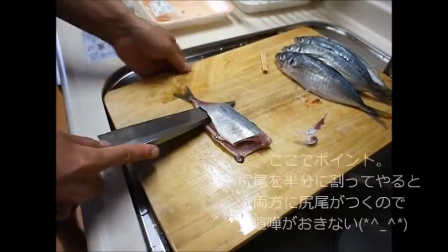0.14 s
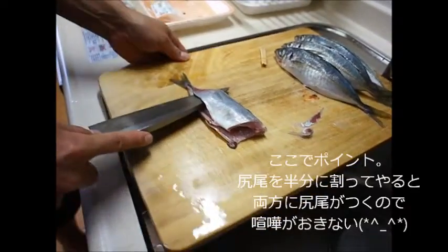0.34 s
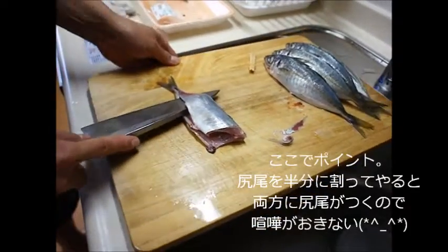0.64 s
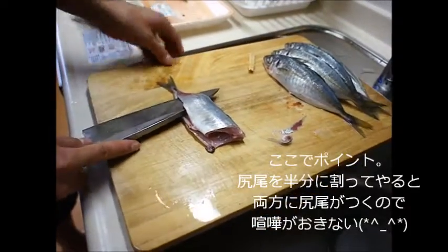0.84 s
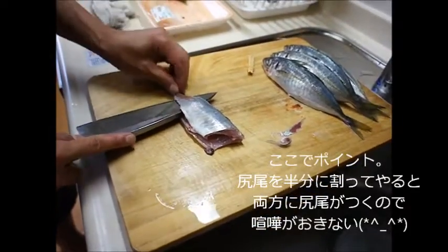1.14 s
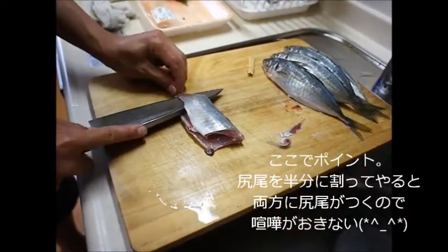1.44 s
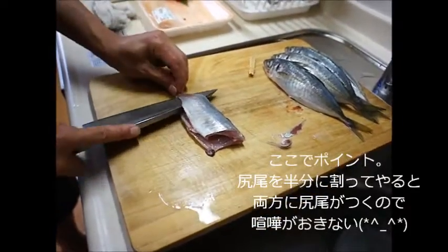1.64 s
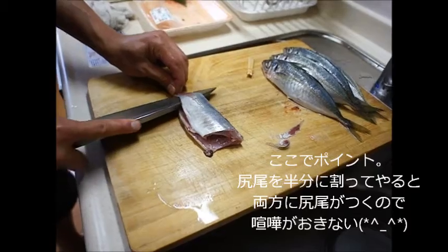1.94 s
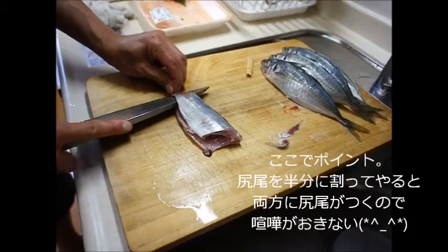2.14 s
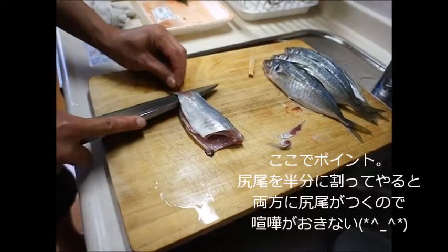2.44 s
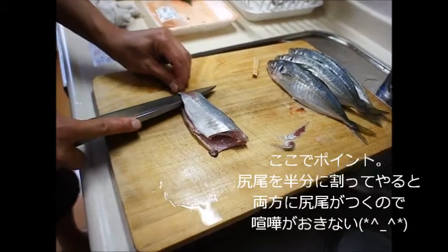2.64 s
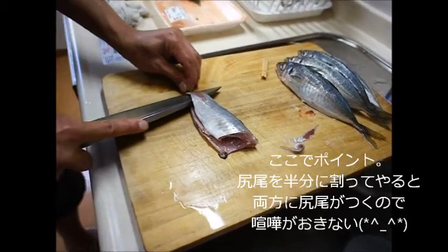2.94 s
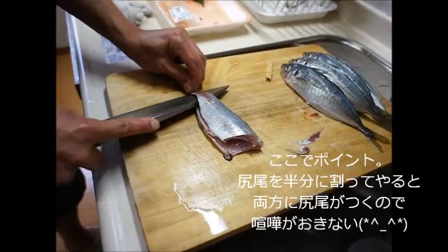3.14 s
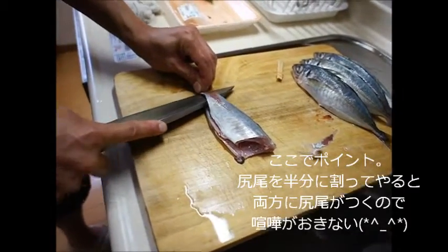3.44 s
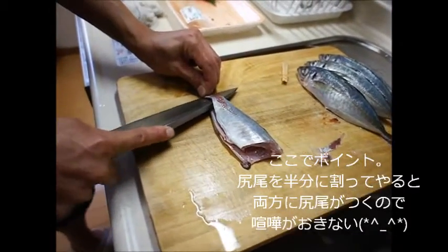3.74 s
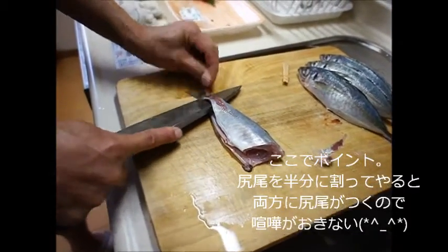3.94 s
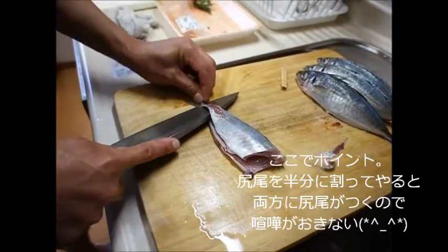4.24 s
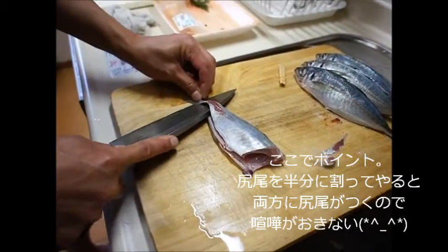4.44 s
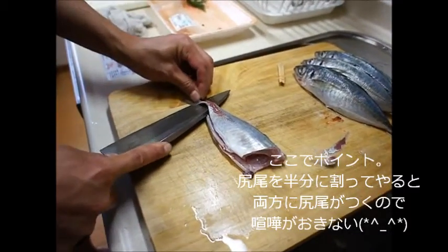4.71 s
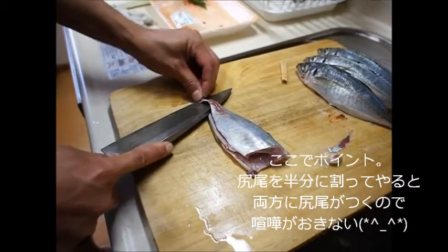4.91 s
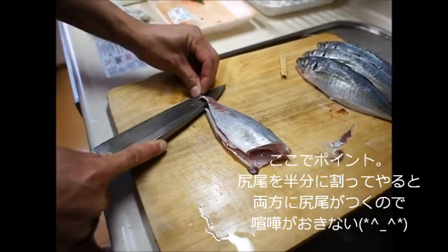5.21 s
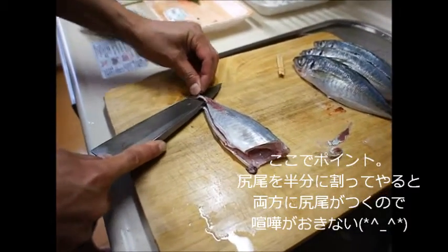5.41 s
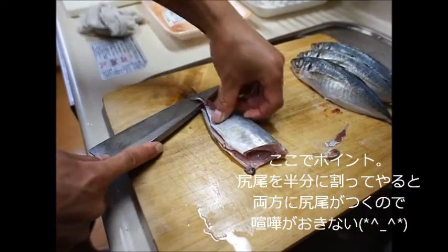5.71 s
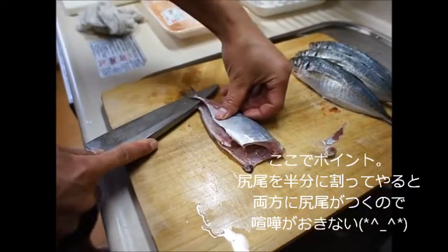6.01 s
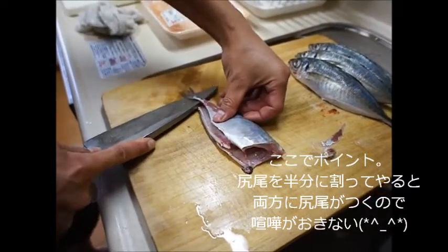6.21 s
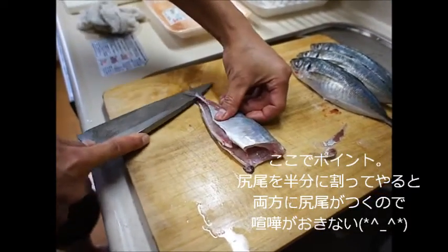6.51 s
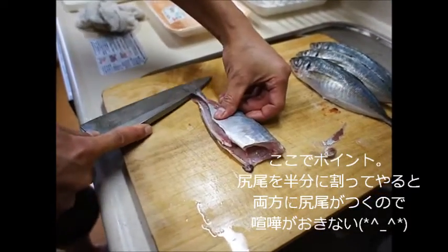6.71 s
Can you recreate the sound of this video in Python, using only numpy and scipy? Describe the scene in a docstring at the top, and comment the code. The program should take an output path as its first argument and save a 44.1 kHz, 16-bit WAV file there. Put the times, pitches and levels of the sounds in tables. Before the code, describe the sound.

Gritty sawing strokes and knocks of a blade on a cutting board, with creaky handling bumps, a ticking lens motor and soft room hum.

```python
"""A kitchen counter, close up: a knife strokes and taps a board to the right of a small hand-held camera.
After the first short strokes the board lands on the counter and rattles; the sawing then thickens.
Strokes are gritty stick-slip force and taps short blows, both driving the board's resonances into a diffuse room.
In the camera the grip creaks in low thumps and the lens motor ticks in every frame; skin ticks, the room hums.
The two ports hear the board with unlike phase; grip and lens come inverted on the right, and weaker."""
import sys
import numpy as np
from scipy import signal
from scipy.fft import rfft, irfft
from scipy.io import wavfile
from scipy.ndimage import uniform_filter1d, map_coordinates

SR = 44100
rng = np.random.default_rng(int(sys.argv[2]) if len(sys.argv) > 2 else 0)


def to_wav(s):
    """Save 16-bit WAV."""
    ch = np.atleast_2d(s).T  # columns
    pcm = np.round(np.clip(ch, -1, 1) * 32767)  # PCM
    wavfile.write(sys.argv[1], SR, pcm.astype(np.int16))


N = 302526
T = np.arange(N) / SR
HZ = np.fft.rfftfreq(N, 1 / SR)

# knife strokes: start t/s, length/s, level/dB, swell over the stroke/dB, then ring, knock, bite re level/dB
STROKES = [(0.027, 0.039, -36, -17.5, 1, -6, -14.5), (.116, 0.035, -35.5, 2, -14, -13, -33),
           (0.178, 0.0083, -16, 10, -13, -37, -49), (1.186, 0.029, -41, -11, -23, -22, -39),
           (1.436, 0.018, -29, 20, -13, -8.5, -13), (1.507, 0.08, -26.5, -4, -10.5, -9.5, -17),
           (1.642, 0.094, -22.5, 1.5, -8, -13, -16), (1.8, 0.12, -31.5, -21, -9, -14, -16.5),
           (1.902, 0.1, -26.5, 6.5, -3.5, -10.5, -11.5), (2.037, 0.085, -26.5, 12.5, -5.5, -14.5, -16),
           (2.168, 0.094, -18, -7, -8, -12, -19.5), (2.552, .14, -25.5, 12, -7.5, -12.5, -20.5),
           (2.744, 0.079, -21, 14.5, -3.5, -10.5, -16), (2.878, 0.097, -31, 5.5, -6, -6.5, -12.5),
           (3.013, 0.088, -22, 0, -6.5, -5.5, -13.5), (3.152, 0.078, -24.5, 6, -5, -9, -17),
           (3.288, 0.059, -16.5, 1.5, -8.5, -10, -17.5), (3.36, 0.014, -21, -9, -15, -12, -30),
           (3.415, 0.062, -18.5, 1.5, -8, -8, -18), (3.515, 0.086, -17.5, 3.5, -3, 1.5, -11),
           (3.65, 0.077, -24, 4, 3, 4, -12.5), (3.757, 0.067, -18, 2.5, 0.5, -0.5, -9),
           (3.826, 0.026, -24, 1, 2, 13.5, -6.5), (4.947, 0.07, -29, 2, -7, 2.5, -12),
           (5.083, 0.066, -27.5, -3, -14, 2, -14.5), (5.209, 0.068, -24, -7, -1, 5.5, -15),
           (5.31, 0.037, -26.5, -7, -5, -6, -26), (6.225, 0.069, -21, -5, -0.5, -14, -19),
           (6.305, 0.04, -27.5, 3, -1, -4, -16.5), (6.345, 0.04, -40.5, -3, -11, 3, -1.5)]
# blade taps on the board: t/s, crack level/dB, blow level/dB
TAPS = [(0.1751, -73, -18), (0.416, -72, -26), (1.345, -39, -64), (1.458, -40, -33), (1.7974, -38, -27.5),
        (1.9245, -58, -19), (1.954, -52, -21.5), (2.187, -46, -29), (2.0598, -33.5, -41),
        (2.234, -30.5, -47), (2.7872, -26.5, -27), (2.809, -23.5, -35), (3.039, -32, -36),
        (3.287, -21, -28), (3.42, -69, -43), (3.5368, -36, -21.5), (3.571, -21.5, -21.5), (3.603, -40, -25),
        (3.656, -38, -33), (3.69, -41, -32), (3.762, -44, -24), (3.7758, -23.5, -15), (3.7916, -14, -27),
        (3.814, -22, -30), (3.838, -37, -30), (4.9492, -48.5, -19.5), (5.0874, -46.5, -22.5),
        (5.2229, -39.5, -22), (6.2124, -38, -9)]
# the board lands on the counter, hard against hard: t/s, crack level/dB, blow level/dB
LANDINGS = [(.478, -20.5, -15.5), (.526, -45, -24.5), (0.5477, -18, -23.5), (0.572, -36, -27),
            (0.594, -47, -42)]


def undb(db):
    """Amplitude ratio of a level in dB."""
    return 10 ** (np.asarray(db) / 20)


def over_hz(table, hz=HZ):
    """A (f/Hz, value) table read on a log-frequency axis."""
    f, v = np.transpose(table)
    return np.interp(np.log(hz + 20), np.log(f + 20), v)


def unit(x):
    """The signal scaled to an rms of 1."""
    return x / np.sqrt(np.mean(x ** 2))


def add(track, s, sound):
    """Lay a sound into the track at s seconds."""
    i = int(s * SR)
    track[i:i + len(sound)] += sound[:max(N - i, 0)]


def peak(x, hz, width, order):
    """A resonance: one pass answers a blow at once, two passes have steep flanks."""
    b, a = signal.iirpeak(hz, hz / width, SR)
    for _ in range(order):
        x = signal.lfilter(b, a, x)
    return x


def ring(x, modes, wander_db=0., order=2):
    """Sum of resonances, rms near 1 for white noise; each one's share wanders as the contact point moves."""
    hz, width, db = np.transpose(modes)
    width = np.maximum(width, hz / 30)  # no mode is sharper than this
    knots = np.arange(0, T[-1] + .1, .06)
    out = 0
    for f, w, d in zip(hz, width, db):
        share = undb(d)
        if wander_db:
            share = undb(np.interp(T, knots, d + wander_db * rng.standard_normal(len(knots))))
        out = out + peak(share * x, f, w, order)
    return out / np.sqrt(np.sum(undb(2 * db) * np.pi * width / (2 * SR)))


def burst(t60, rise_s=0.00025):
    """Noise that rises fast and dies away by 60 dB in t60 seconds."""
    t = T[:4000]
    fade = undb(-60 * np.maximum(t - rise_s, 0) / t60)
    return rng.standard_normal(len(t)) * np.clip(t / rise_s, 0, 1) * fade


def grit(scatter_db, grain_s):
    """Stick-slip force: noise in grains of uneven size."""
    k = max(int(grain_s * SR), 1)
    size = undb(scatter_db * np.minimum(rng.exponential(size=N // k + 1), 3))
    return unit(rng.standard_normal(N) * uniform_filter1d(np.repeat(size, k)[:N], k))


def hum():
    """Steady room and preamplifier noise, partly inverted between the sides."""
    # noise colour of room and preamplifier: f/Hz, level/dB per Hz
    room_colour = [(40, -9), (113, -2.5), (250, -1.5), (440, -6), (700, -8), (1100, -12.5), (2100, -17.5),
                   (3900, -20.5), (5700, -24), (11000, -27.5), (13000, -34.5)]
    # left side re right: f/Hz, level/dB
    left_db = [(60, 11.5), (400, -1), (2400, -3), (8000, -2), (14000, -6)]
    # likeness of the two sides: f/Hz, left-right correlation (negative is inverted)
    likeness = [(60, -0.34), (600, -0.56), (3000, -0.2), (7000, 0.13)]
    a, b = rfft(rng.standard_normal((2, N)))
    c = over_hz(likeness)
    tilt_db = over_hz(left_db) / 2
    pair = np.array([a * undb(tilt_db), (c * a + np.sqrt(1 - c ** 2) * b) * undb(-tilt_db)])
    return undb(-47) * unit(irfft(pair * undb(over_hz(room_colour)), N))


def lens():
    """The motor steps at the same places in every frame: a tick, then a whirr in the case's high modes."""
    # modes of the camera's case: f/Hz, width/Hz, level/dB
    case_modes = [(876, 275, 28), (3100, 2500, 7.5), (3860, 560, 12.5), (4210, 610, 9), (5440, 100, -13)]
    # effort of the motor: t/s, level/dB
    effort = [(0, 5), (.98, 7), (1.06, -16), (2.55, -20), (3.1, 0.5), (4.2, 6.5), (5.5, 2.5), (6.86, 5)]
    # steps within each frame: start t/s, length/s, tick level/dB, whirr level/dB
    steps = [(.0045, 0.015, -40.5, -55.5), (0.0188, 0.0018, -51, -59), (0.0236, 0.0075, -43, -61),
             (0.034, 0.0041, -46.5, -55.5)]
    # short whines: t/s, level/dB
    whines = [(0.9844, -35), (3.135, -34.5), (3.203, -34.5)]
    frame_s, whine_hz, whine_s = 1001 / 30000, 3790, 0.021
    whirr_share = 0.3  # the whirr follows the effort less than the ticks

    tick_push, whirr, place = np.zeros(N), np.zeros(N), T % frame_s
    starts = np.arange(0, T[-1] - frame_s, frame_s)
    for s, length, tick_db, whirr_db in steps:
        tick_push[((starts + s) * SR).astype(int)] += undb(tick_db + 2.2 * rng.standard_normal(len(starts)))
        whirr += undb(whirr_db) * ((place - s) % frame_s < length)
    whirr = uniform_filter1d(whirr, size=60) * rng.standard_normal(N)
    # each step is a short push
    tick_push = signal.lfilter(signal.windows.hann(int(0.00037 * SR)) / 4, 1, tick_push)
    thud = signal.lfilter(*signal.iirpeak(330, 1.2, SR), tick_push)
    effort_db = np.interp(T, *np.transpose(effort))
    out = undb(effort_db) * (2.36 * ring(tick_push, case_modes) + 32.2 * thud)
    out += undb(whirr_share * effort_db + 3) * ring(whirr, case_modes[1:])

    t = T[:int(whine_s * SR)]
    edges = np.clip(np.minimum(t, t[-1] - t) / 0.002, 0, 1)
    for s, db in whines:  # a run of fast steps, hardest as it sets off
        shape = (0.5 + 0.75 * np.exp(-(t / 0.0064) ** 2)) * edges
        add(out, s, undb(db) * shape * np.sin(2 * np.pi * whine_hz * t))
    return out


def slips():
    """Grip slips at set times plus random ones that fill gaps in the creak: crest t/s, level/dB, f/Hz, trough/dB."""
    # slips felt through the case: crest t/s, crest level/dB, pitch at the crest f/Hz
    timed = [(0.137, -20.5, 170), (.185, -18.5, 183), (0.2047, -14, 400), (0.7372, -1, 445),
             (0.8844, -17, 258), (2.144, -19.5, 225), (3.115, -19, 175), (3.141, -16.5, 240),
             (3.175, -7.5, 280), (3.219, -8.5, 270), (3.255, -8, 245), (3.278, -9, 242), (3.2949, -3, 240),
             (3.3204, -9, 220), (3.352, -10, 220), (3.3791, -5.5, 188), (3.4, -11, 230), (3.422, -6, 210),
             (3.442, -10, 240), (3.463, -10, 210), (3.49, -8, 230), (3.507, -8, 200), (3.5282, -3, 200),
             (3.547, -7, 231), (3.566, -7, 277), (3.617, -8, 153), (3.636, -10, 230), (3.655, -7.5, 210),
             (3.68, -10, 260), (3.7112, -12.5, 320), (3.7556, -11, 315.6), (3.8451, -10, 177),
             (3.8763, -8, 261), (3.905, -10.5, 231.3), (3.9331, -10, 168.4), (3.957, -6.5, 204),
             (3.9741, -7.5, 235), (3.989, -7, 210), (4.009, -12, 230), (4.0173, -13, 150),
             (4.0282, -7, 141), (4.0578, -11, 230), (4.073, -7.5, 248), (4.09, -9.5, 248), (4.108, -4, 151),
             (4.114, -5.5, 280), (4.128, -11, 200), (4.135, -8, 419), (4.159, -11, 383), (4.177, -8, 282),
             (4.2172, -7.5, 235), (4.32, -12, 265), (4.4325, -11.5, 296.6), (4.475, -25.5, 366),
             (4.514, -3.5, 320), (4.5554, -14, 427), (4.5679, -8.5, 240), (4.5969, -11.5, 250),
             (4.612, -22, 385), (4.7929, -12, 387), (4.826, -21.5, 133), (4.863, -19, 236),
             (4.9208, -24, 159), (5.578, -27, 307), (5.6243, -31, 260.9), (6.601, -20.5, 128.9)]
    creak_start_s, creak_end_s, period_s, jitter_s = 3.25, 4.22, 0.021, 0.00205
    creak_db, scatter_db, creak_hz = -11.5, 2, 254
    # trough before the crest, re crest; a quicker slip in the creak digs a deeper one
    creak_trough_db, lone_trough_db, trough_db_per_octave = -10, -1.4, 16

    def creaking(s):
        return creak_start_s < s < creak_end_s

    rows = []
    for s, db, hz in timed:
        trough_db = lone_trough_db
        if creaking(s):
            trough_db = min(creak_trough_db + trough_db_per_octave * np.log2(hz / creak_hz), 0)
        rows.append((s, db, hz, trough_db))
    for (a, *_), (b, *_) in zip(timed, timed[1:]):
        if creaking(a) and creaking(b):
            gaps = max(round((b - a) / period_s), 1)
            for s in np.linspace(a, b, gaps + 1)[1:-1]:
                late, size, pitch = rng.standard_normal(3)
                rows.append((s + jitter_s * late, creak_db + scatter_db * size,
                             creak_hz * np.exp(.15 * pitch), creak_trough_db))
    return rows


def grip():
    """Each slip bends the case: the quick waves come first, the pitch sinks to the case's slow wobble."""
    # the hand rubs and sways the camera: t/s, relative level/dB
    hand_sway = [(0.0, -59), (0.88, -58), (0.97, -68), (2.79, -56.5), (3.4, -36.5), (3.7, -41.5),
                 (4.18, -32.5), (4.3, -41.5), (6.46, -66), (6.61, -52), (6.69, -69), (6.86, -70)]
    wobble_hz = 105
    out, t = np.zeros(N), T[:2600] - 600 / SR  # the crest is at t = 0
    for s, db, hz, trough_db in slips():
        pitch_hz = wobble_hz + (hz - wobble_hz) * np.exp(-np.clip(t / 0.0012, -.35, 20))
        phase = 2 * np.pi * np.cumsum(pitch_hz) / SR
        phase -= np.interp(0, t, phase)
        trough = undb(trough_db * np.clip(-phase / np.pi, 0, 1))
        before = trough * np.clip(2.4 + phase / (1.2 * np.pi), 0, 1) ** 2
        after = 0.5 * np.exp(-t / 0.00081) + 0.46 * np.exp(-t / 0.0087)
        add(out, s + t[0], undb(db) * np.where(t < 0, before, after) * np.cos(phase))
    # soft skin rounds every slip
    out = signal.sosfiltfilt(signal.butter(2, 1700, fs=SR, output="sos"), out)
    rub = undb(np.interp(T, *np.transpose(hand_sway)) + 9) * grit(4.0, 0.011)
    # low modes of the case: f/Hz, width/Hz, level/dB
    return out + ring(rub, [(65.5, 45, 0.5), (127.5, 45, -5.0), (419, 264, -11.5)])


def pressure(s, length, swell_db):
    """Force of one stroke: rise, swell (one row per mode group), release."""
    release_s = 0.059
    struck = np.min(np.abs(np.array(TAPS + LANDINGS)[:, 0] - s)) < .012
    rise_s = 0.0047 if struck else 0.28 * length  # a stroke that begins with a blow starts at once
    span = slice(int(s * SR), int((s + length + release_s) * SR))
    t = T[span] - s
    edges = np.clip(t / rise_s, 0, 1) * np.clip((length - t) / release_s + .5, 0, 1)
    return span, np.sin(np.pi / 2 * edges) ** 2 * undb(swell_db * (np.clip(t / length, 0, 1) - .5))


def catches():
    """The edge catches on grain and bone: brief jolts of force at random moments."""
    rate_per_s, jolt_db, fade_s = 70, 3, 0.0017  # jolt re the steady rub
    jolt = (rng.random(N) < rate_per_s / SR) * rng.exponential(size=N)
    return unit(1 + undb(jolt_db) * signal.lfilter([1], [1, -np.exp(-1 / (fade_s * SR))], jolt))


def blows(rows):
    """Force of short blows on four mode groups; the last two rows are the crack toward each port."""
    knock_share = 0.47  # a blow takes this share of the nearest stroke's knock dB
    hit = np.zeros((6, N))
    for s, crack_db, blow_db in rows:
        contact_s = 0.00069 * np.exp(-0.03 * (crack_db + 25))  # a sharper crack is a shorter contact
        width = max(int(contact_s * SR), 6)
        # a shorter contact reaches higher modes
        blow = undb(blow_db) * signal.windows.hann(width) / (width / SR)
        knock_db = min(STROKES, key=lambda row: abs(row[0] - s))[5]
        add(hit[0], s, 0.0013 * blow)
        add(hit[1], s, 0.00076 * blow)
        add(hit[2], s, 0.0016 * undb(knock_share * knock_db) * blow)
        add(hit[3], s, 0.0012 * blow)
        add(hit[3], s, undb(crack_db + 1.0) * burst(0.0095))
        for side in hit[4:]:
            add(side, s, undb(crack_db - 2.5) * burst(0.022))
    return hit


def bend(x):
    """The hand's weight shifts the board's modes: pitch sways as the sound is read through a moving delay."""
    shift = 0.0122  # typical share of the pitch
    knots = np.arange(0, T[-1] + .2, .09)
    sway = shift * rng.standard_normal(len(knots) + 1)
    offset_samples = np.cumsum(np.interp(T, knots, np.diff(sway) / np.sqrt(2)))
    return map_coordinates(x, [np.arange(N) + offset_samples], order=1, mode="nearest")


def knife():
    """Strokes, taps and landings drive the board; returns the dry sound toward the left and the right port."""
    # fingers slide over fish and board as the hand takes a new hold: start t/s, length/s, level/dB,
    # swell over the slide/dB, then ring, knock, bite re level/dB
    fingers = [(1.317, 0.12, -35, 19, -15, -8.5, -17.5), (4.086, 0.12, -44, 9, 2, -7, -4.5),
               (4.23, 0.098, -31.5, 0, -12, -6.5, -14.5), (4.392, 0.059, -36.5, -4, -9, -4.5, -12.5),
               (4.513, 0.065, -35, -1.5, 2, 5, -8), (4.651, 0.034, -37.5, -4, -16, -12, -17)]
    # board modes, low ones that answer any push: f/Hz, width/Hz, level/dB
    body_modes = [(149.6, 31, -13), (192.2, 42, -5.5), (221.5, 45, -5), (266.8, 41, 2), (292.2, 27.6, -3),
                  (371, 69, -23.5)]
    # those that ring clearest: f/Hz, width/Hz, level/dB
    ring_modes = [(507.5, 11, -11), (557.4, 43, 2), (591.8, 31.5, -3.5), (668, 26, -10.5)]
    # middle ones: f/Hz, width/Hz, level/dB
    knock_modes = [(738, 102, 1), (801, 74, 1.5), (877.5, 75, 2.5), (968.5, 74, 5.5), (1011, 45, 1.5),
                   (1049, 60, 0.5), (1137, 126, -3.5), (1302, 69, -9.5)]
    # high ones that answer the bite of the edge: f/Hz, width/Hz, level/dB
    bite_modes = [(1446, 126, 4.5), (1574, 86, 5), (1700, 110, 9.5), (1799, 106, 5.5), (1990, 74, 3.5),
                  (2230, 116, 0.5), (2413, 180, 2), (2620, 120, 2), (2763, 100, 1.5), (2970, 320, -1.5)]
    # broad hiss of the edge: f/Hz, width/Hz, level/dB
    hiss_modes = [(3420, 620, 16), (4410, 2830, 20.3), (6600, 6000, 11), (9370, 6500, 3.6)]
    stroke_hiss_db, finger_hiss_db = -8.5, 1  # re bite
    tap_db = 1  # a blade tap in the board modes, re a landing
    alike = 0.4  # share of the hiss that both sides hear alike

    push = np.zeros((5, N))
    # the treble follows the pressure more steeply
    steepness = np.array([[1.0], [1.0], [1.05], [1.15], [1.25]])
    rows = [(*row, stroke_hiss_db) for row in STROKES] + [(*row, finger_hiss_db) for row in fingers]
    for s, length, db, swell_db, ring_db, knock_db, bite_db, hiss_db in rows:
        span, force = pressure(s, length, swell_db * steepness)
        group_db = np.array([0, ring_db, knock_db, bite_db, bite_db + hiss_db])
        push[:, span] += force * undb(db + group_db[:, None])
    push[:4] *= catches()
    rub = push * np.array([grit(1.25, 0.013), grit(1.17, 0.0057), grit(4.0, 0.0047),
                           grit(0.49, 0.0019), grit(0.32, 0.0022)])

    taps, lands = blows(TAPS), blows(LANDINGS)
    board = rattle()
    thin = signal.butter(3, 115, "high", fs=SR, output="sos")  # a small board radiates no deep bass
    groups = (body_modes, ring_modes, knock_modes, bite_modes)
    for r, tap, land, modes in zip(rub, taps, lands, groups):
        worked = ring(r + undb(tap_db) * tap, modes, wander_db=2.5)
        board += signal.sosfilt(thin, bend(worked))
        # all landings fall in the first second
        add(board, 0, signal.sosfilt(thin, ring(land[:SR], modes, order=1)))
    crack = taps[4:] + lands[4:]
    hiss = ring(rub[4] + crack[0], hiss_modes)
    other = ring(push[4] * grit(1.0, 0.0016) + crack[1], hiss_modes)
    return board + alike * hiss + np.sqrt(1 - alike ** 2) * other, board + hiss


def kitchen(x):
    """Diffuse tail, unrelated on the two sides, with its own decay time in every octave."""
    # reverberation time: f/Hz, T60/s
    t60_s = [(150, 0.46), (1000, 0.36), (4000, 0.67), (10000, 0.93)]
    t = T[:SR]
    tail = 0
    for hz in 125. * 2. ** np.arange(7):
        band = signal.butter(2, [hz / np.sqrt(2), hz * np.sqrt(2)], "band", fs=SR, output="sos")
        fade = undb(-60 * t / over_hz(t60_s, hz)) * np.clip(t / 0.0011, 0, 1)
        tail = tail + signal.sosfilt(band, rng.standard_normal((2, SR))) * fade
    tail = tail / np.sqrt(np.sum(tail ** 2, axis=1, keepdims=True))
    return undb(-16) * signal.fftconvolve(x[None], tail, axes=1)[:, :N]


def ticks():
    """Wet skin ticks as fingers peel off it: tiny and bright, unlike on the two sides."""
    # ticks: t/s, level/dB
    peels = [(.181, -37), (.194, -48), (0.339, -45), (0.439, -39), (0.736, -45), (1.3175, -44), (1.41, -52),
             (4.277, -40), (4.815, -42), (5.765, -47), (5.788, -45), (5.863, -45), (5.905, -42),
             (5.933, -49), (6.1974, -50), (6.8008, -41)]
    # bright resonances of a tick: f/Hz, width/Hz, level/dB
    skin_modes = [(7000, 3000, -6), (9700, 4800, 5), (11900, 2200, -8)]
    out = np.zeros((2, N))
    for s, db in peels:
        for side in out:
            add(side, s, undb(db) * burst(0.008))
    return ring(out, skin_modes) * undb(np.array([[-3.], [0]]))  # weaker on the left


def rattle():
    """Board against counter: a dense ring with a few clear modes, low and high shaken separately."""
    # rattles as the board is set down: start t/s, length/s, low level/dB, swell/dB, high level/dB
    shakes = [(0.473, 0.079, -12.5, 1, -31.5), (0.544, 0.054, -19, -17.5, -18),
              (0.572, 0.19, -29, -18.5, -33), (0.735, 0.21, -46.5, -19, -52)]
    # dense ring of the counter: f/Hz, level/dB per Hz
    dense_ring = [(47, -50), (80, -31), (144, -5.5), (333, -9), (651, -3.5), (1100, -5), (1940, -9.5),
                  (3070, -19.5), (5300, -31.5), (12000, -65), (15600, -84), (22000, -120)]
    # clearest modes of the counter: f/Hz, width/Hz, level over the dense ring/dB
    clear_modes = [(152, 33, 4.5), (287, 34, 9), (372, 46, 4.5), (653, 37, 7.5), (875, 35, 5),
                   (1002, 35, 5), (1360, 90, 2), (1610, 100, 6), (1950, 70, 3.5), (2320, 57, 5),
                   (2590, 90, 6), (3050, 70, 7)]
    split_hz = 1130
    high = 1 / (1 + (split_hz / (HZ + 1)) ** 4)
    bumps_db = sum(db / (1 + (2 * (HZ - hz) / width) ** 2) for hz, width, db in clear_modes)
    colour = undb(over_hz(dense_ring) + bumps_db)
    low_noise, high_noise = [unit(irfft(rfft(grit(2.9, 0.004)) * colour * part, N)) for part in (1 - high, high)]
    out = np.zeros(N)
    for s, length, low_db, swell_db, high_db in shakes:
        span, force = pressure(s, length, swell_db)
        out[span] += force * (undb(low_db) * low_noise[span] + undb(high_db) * high_noise[span])
    return out


def clicks():
    """Short cracks ring the camera's case; each port hears its own, the right one weaker."""
    # cracks: t/s, level/dB
    cracks = [(1.009, -32.5), (4.0167, -33), (4.0682, -33), (4.0873, -27), (4.1072, -30), (4.142, -28),
              (4.157, -23), (4.1145, -35), (4.165, -27), (4.172, -20), (4.178, -27), (4.1862, -8.5),
              (4.39, -33)]
    # modes a crack rings: f/Hz, width/Hz, level/dB
    shell_modes = [(650, 70, 20.5), (910, 690, 14), (2320, 1300, -0.5), (3140, 1730, 7), (4070, 1500, 8.5),
                   (6340, 6900, -6), (11400, 16000, -24)]
    # cracks at the right port re the left: f/Hz, level/dB
    right_db = [(600, -9), (3000, -18), (5000, -19), (9000, -14), (13000, -8)]
    knocks = np.zeros((2, N))
    for s, db in cracks:
        for side in knocks:
            add(side, s, undb(db) * burst(0.017, rise_s=0.0018))
    left, right = ring(knocks, shell_modes)
    return np.array([left, irfft(rfft(right) * undb(over_hz(right_db)), N)])


def scene():
    """Board, camera case, skin, room tail and hum meet at the two ports."""
    # board at the left port re the right: f/Hz, level/dB
    board_left_db = [(110, 1), (200, -2), (380, -3.5), (690, -7), (1280, -8.5), (2360, -9.5), (4360, -5),
                     (8000, -8), (14800, -6)]
    # its phase there: f/Hz, lead/rad (negative lags)
    board_left_rad = [(20, -1), (130, -1.4), (260, -1.8), (860, -2.8), (1700, -3.5), (3500, -3.7),
                      (5200, -4.6), (12000, -5.0)]
    toward_left, board = knife()
    path = undb(over_hz(board_left_db)) * np.exp(1j * over_hz(board_left_rad))
    left = irfft(rfft(toward_left) * path, N)
    case = grip() + lens()
    right = board - undb(-10.5) * case  # the case reaches the right port inverted
    return np.array([left + case, right]) + clicks() + ticks() + kitchen(board) + hum()


def record(dry):
    """The treble rolls off, the loudest peaks clip, the deep bass and the top are cut."""
    soft = signal.sosfilt(signal.butter(4, 11950, fs=SR, output="sos"), dry)
    clipped = np.clip(soft, -.95, .95)
    trimmed = signal.sosfilt(signal.butter(2, 46, "high", fs=SR, output="sos"), clipped)
    return signal.sosfilt(signal.ellip(8, .2, 70, 12800, fs=SR, output="sos"), trimmed)


dry = scene()
out = record(dry)
to_wav(out)
```